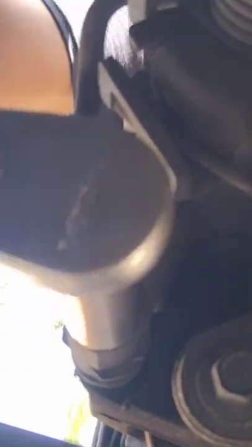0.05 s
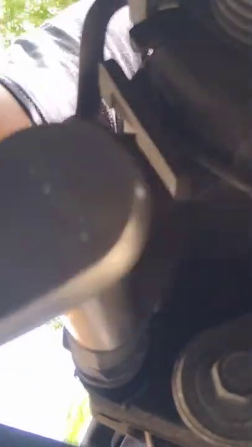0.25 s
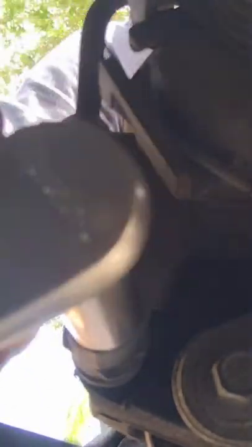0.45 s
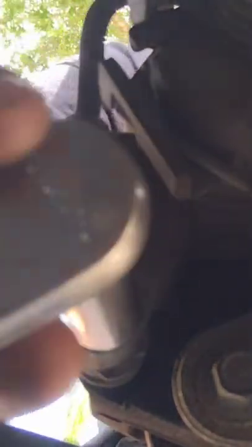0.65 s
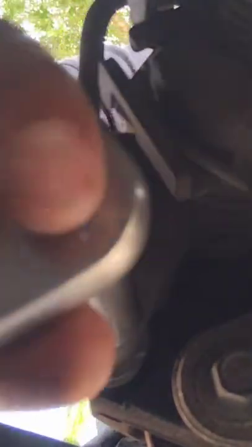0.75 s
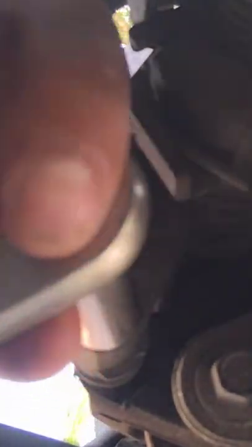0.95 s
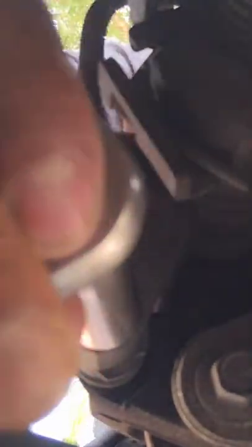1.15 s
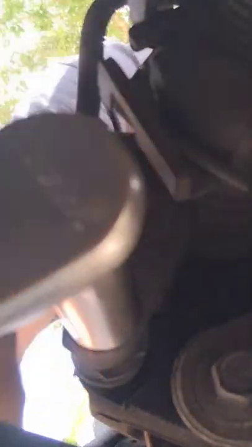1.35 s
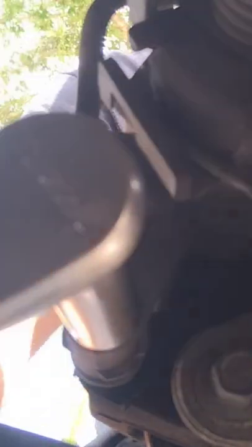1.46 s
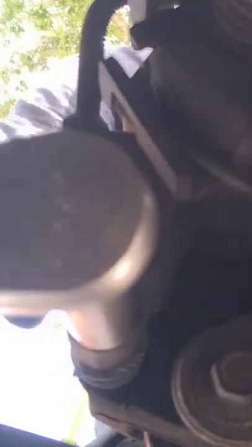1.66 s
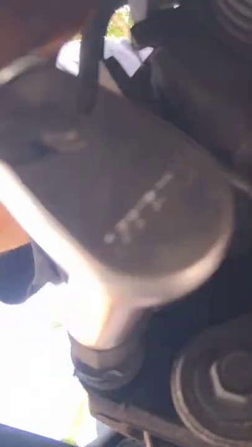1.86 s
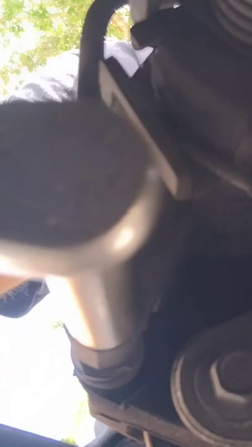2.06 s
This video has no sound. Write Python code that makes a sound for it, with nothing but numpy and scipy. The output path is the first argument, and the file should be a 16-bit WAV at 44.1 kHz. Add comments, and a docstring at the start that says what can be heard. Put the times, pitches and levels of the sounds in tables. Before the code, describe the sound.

A hand ratchet works a bolt under a vehicle, very close and dry. After a slight slide at 0.2 s, the socket strikes at 0.25 s with a loud bright steel clink, clatter and dull boom, dying quickly. Faint finger rubs follow until about 1.65 s. A gritty scrape peaks near 1.74 s, then six small crisp clicks run from 1.83 to 2.0 s, the last two nearly together. Quiet outdoor rumble and hiss.

```python
"""Hand ratchet on a bolt

A hand ratchet is worked on a bolt under a vehicle, very near a two-port microphone, over outdoor rumble and hiss.
Fingers and socket slide as shaped noise; the socket clinks home as damped steel modes, clatter and a dull boom.
It scrapes free as gritty noise that excites the steel, while the pawl clicks six times, the last two close
together, each click a burst of noise and modes that bounces twice and rattles out.
Level and phase differ between the ports, and loud sound makes the microphone's bias sag."""
import sys
import numpy as np
from scipy import signal
from scipy.fft import rfft, irfft, next_fast_len
from scipy.io import wavfile
from scipy.ndimage import map_coordinates

SR = 44100
rng = np.random.default_rng(int(sys.argv[2]) if len(sys.argv) > 2 else 0)


def wrap_up_sound(samples):
    """Save the sound to the file named by the first command line argument, as 16-bit audio."""
    columns = np.atleast_2d(samples).T
    # keep every value between -1 and 1, then stretch to whole-number steps
    tamed = np.clip(columns, -1, 1)
    steps = np.round(tamed * 32767).astype(np.int16)
    wavfile.write(sys.argv[1], SR, steps)


N = 92610
T = np.arange(N) / SR  # time in seconds
SIDE_OF = np.array([[.5], [-.5]])  # shares a left-right difference between left and right

# Spectrum of the outdoor air. Each row: frequency in Hz, relative level in dB per Hz.
AIR_SPECTRUM = [(12, -36.5), (20, -11), (94, -2.5), (390, -33), (680, -31.5), (1730, -43), (11900, -42.5),
                (14500, -50.5)]
# Correlation of the air between the ports. Each row: frequency in Hz, left-right likeness from 0 to 1.
AIR_LIKENESS = [(60, 0.94), (370, 0.78), (2280, 0.016), (14000, 0.24)]
AIR_DB = -64.5

# Slides of skin and steel. Each row: start in seconds, rise in seconds, hold in seconds, fall t60 in seconds,
# level in dB.
RUBS = [(0.2, 0.014, 0.0083, 0.22, -53.5), (0.285, 0.078, 0.054, 0.11, -61),
        (0.561, 0.0055, 0.0022, 0.29, -67), (.69, 0.013, 0.0082, 0.58, -75),
        (1.001, 0.0026, 0.0029, 0.11, -68), (1.12, 0.0051, 0.0048, 0.26, -77),
        (1.169, 0.019, 0.0026, 0.37, -67.5), (1.299, 0.014, 0.1, 0.11, -72.5),
        (1.548, 0.005, 0.007, 0.28, -71.5), (1.627, 0.037, 0.14, 0.29, -70.5)]
# Spectrum of the sliding friction. Each row: frequency in Hz, relative level in dB per Hz.
RUB_SPECTRUM = [(880, -42), (1500, -11.5), (6040, -12.5), (11800, -1), (14500, -21)]
# Resonances of the ratchet head under the slides. Each row: frequency in Hz, width in Hz, gain in dB.
RUB_RESONANCES = [(5460,27,13.5),(11580,60,7)]

# The frame is nudged, hit, and hums on. Each row: start in seconds, level in dB, t60 in seconds.
THUDS = [(.208, -57, .1), (0.2466, -36.5, .12), (0.259, -51, 0.49)]
# Dull answer of the frame. Each row: frequency in Hz, relative level in dB per Hz.
FRAME_SPECTRUM = [(40,-20),(190,-2),(420,-3),(900,-15.5),(1500,-51.5)]
CLINK_S, CLINK_DB, CLINK_RISE_S = .2474, -13, .0015  # start, gain of the ringing steel, rise
# Pitches of the steel struck on the bolt, in Hz.
SEATED_HZ = [65, 118, 1774, 1853, 2256, 2424, 2709, 3052, 3443, 3889, 4313, 4908, 5328, 5477, 6474, 8852,
             10490, 11780, 12200, 12692]
# The mode at each of those pitches. Each row: relative level in dB, t60 in seconds, left-minus-right level
# in dB, radians by which the left leads.
SEATED_MODES = [(-32.5,0.52,-1,0.5),(-22.5,0.19,-1.5,0.5),(-8,0.1,-1,1),(-15,0.2,0.5,3.5),(-14,0.1,1.5,1.5),(-8,0.13,0,2),(-11,0.14,-1,2),(-14,.42,3.03,2.5),
                (-10.5,.11,3.5,-1.5),(-6.5,.17,2,-1.33),(-12,0.16,5.5,2.5),(4.5,0.13,1.5,3.5),(-10.5,0.17,1.5,1.7),(-16,.13,4.5,1.3),(-14.5,0.15,1.5,-2.5),
                (-3.5,0.073,9.5,4),(-8,.115,0.37,-1.5),(-5,0.067,-9,4),(-3.5,0.092,-13.5,3),(-6,.07,-10,2)]
WEAK_HZ = (1650, 6500)  # range of many small partials between the strong ones
WEAK_DB, WEAK_T60 = -25.5, .1  # their middle relative level, and mean t60 in seconds
LINGER_DB, LINGER_T60 = -35, .4  # a faint part of the modes below that range's top rings on (t60 in s)
WAVER_DB, WAVER_PER_S = 2.5, 70  # each mode's level wavers at random: depth in dB, knots a second
# Noisy part of the clink. Each row: frequency in Hz, relative level in dB per Hz.
CLATTER_SPECTRUM = [(900, -39), (1770, -8), (4970, -5.5), (9410, -5), (12400, 1.5), (14500, -44)]
# Decay of the clatter. Each row: frequency in Hz, t60 in seconds.
CLATTER_T60 = [(1000, .1), (2500, .085), (6000, .055), (9000, .032), (13000, .042)]
CLATTER_DB = -9
# Direction of the clatter at the bolt. Each row: frequency in Hz, left-minus-right level in dB.
BOLT_LEAN = [(1000, 3), (5000, 5), (14000, -10)]

# Course of the drag. Each row: time in seconds, mean grit level in dB, dull rubbing level in dB.
DRAG = [(1.65,-100,-93.5),(1.703,-68.5,-68.5),(1.722,-64,-67),(1.744,-51.5,-67),(1.809,-73,-82.5),(1.991,-67,-71.5),(2.05,-88,-91.5)]
# Spectrum of the grit. Each row: frequency in Hz, relative level in dB per Hz.
SCRAPE_SPECTRUM = [(600, -21), (1900, -8.5), (4130, -19.5), (11700, -10.5), (14500, -21)]
# Modes of the same steel lifted off the bolt. Each row: frequency in Hz, relative level in dB, t60 in seconds.
FREED_MODES = [(1795,-17,3),(2185,-3,.4),(2420,4,.12),(3052,3,.22),(3890,-3,.2),(4910,6,.15),(5070,-19,1.5),(5471,5,.2)]
SCRAPE_RING_DB = -36

# Pawl clicks. Each row: start in seconds, level in dB, rattle t60 in seconds, mid-band share in dB
# (before a fixed 8 dB is added).
CLICKS = [(1.8283, -39, 0.0573, -15.5), (1.8845, -42.5, 0.046, -9), (1.929, -38.5, 0.077, -17),
          (1.9603, -41, 0.049, -10.5), (1.9889, -42, 0.063, -11.5), (1.999, -50.5, 0.088, -4.5)]
# Modes of the pawl. Each row: frequency in Hz, middle relative level in dB, t60 in seconds.
PAWL_MODES = [(3310, -22, 0.09), (5960, -14, 0.044), (9945, 2.5, 0.047), (10620, -7, 0.057),
              (14130, -13, 0.055)]
# Bright spray of a click. Each row: frequency in Hz, relative level in dB per Hz.
SNAP_SPECTRUM = [(1800, -60), (3530, -35.5), (9300, -14.5), (10400, -6), (13900, -17)]
# Duller part of a click. Each row: frequency in Hz, relative level in dB per Hz.
HEAD_SPECTRUM = [(2000,-23.5),(3300,-7.5),(6000,-6),(9000,-11)]
PAWL_DB, MODE_SCATTER_DB = -5, 5  # ring against the click level, and random spread of its modes
BOUNCE_S, BOUNCE_LOSS_DB = .0014, 3  # nominal spacing of the bounces, loss at each
TICK_DB, TICK_T60, RATTLE_DB = 15, .004, 2  # levels against the click level, t60 in seconds
HEAD_SHARE = .5  # duller part's t60 as a share of the rattle's

# Direction of the ratchet head. Each row: frequency in Hz, left-minus-right level in dB.
HAND_LEAN = [(370, 0), (2280, 7), (14000, -5.5)]
# Phase of the ratchet head. Each row: frequency in Hz, radians by which the left leads.
HAND_TURN = [(0, -1), (3010, -14), (14200, -51.5)]
SPREAD_DB = -.5  # unlike part of near noises at the two ports

# Bias sag under loud sound. Each row is one port, left then right: gain of the squared pressure in dB.
SAG_DB = [
    [-0.5],
    [5],
]
SAG_FAST_HZ, SAG_SLOW_HZ = 10, 2.2  # corner of the sag's onset and of its recovery
TOP_HZ = 14600  # band limit


def amp(db):
    """Decibel law: amplitude gain of a level in dB."""
    return 10 ** (np.asarray(db) / 20)


def unit(x):
    """Normalisation of power: the signal scaled to rms 1."""
    return x / np.sqrt(np.mean(x ** 2) + 1e-20)


def along(points, hz):
    """Linear interpolation of (Hz, value) points on a logarithmic frequency axis."""
    f, value = np.transpose(points)
    return np.interp(np.log(hz + 1), np.log(f + 1), value)


def filtered(x, response):
    """Linear filtering: the spectrum of x times a complex response of frequency."""
    size = next_fast_len(N + 8192)
    spectrum = rfft(x, size) * response(np.fft.rfftfreq(size, 1 / SR))
    return irfft(spectrum, size)[..., :N]


def wobble(rate):
    """Spline interpolation of random knots, rate of them a second, into a smooth curve."""
    knots = rng.standard_normal(int(N * rate / SR) + 4)
    return map_coordinates(knots, [T * rate])


def placed(x, lean, turn):
    """Interaural-style cues: level and phase differences between the ports, by frequency."""
    def response(hz):
        return amp(SIDE_OF * along(lean, hz)) * np.exp(1j * SIDE_OF * along(turn, hz))
    return filtered(x, response)


def hiss(spectrum):
    """Partial coherence of a near noise: a shared part and an opposed part, rms 1 over both ports."""
    shared, opposed = filtered(rng.standard_normal((2, N)), lambda hz: amp(along(spectrum, hz)))
    opposed = amp(SPREAD_DB) * opposed
    return unit(np.array([shared + opposed, shared - opposed]))


def dull():
    """Coloured noise: the low answer of the frame, rms near 1, mostly alike at both ports."""
    shared, opposed = unit(filtered(rng.standard_normal((2, N)), lambda hz: amp(along(FRAME_SPECTRUM, hz))))
    return shared + SIDE_OF * opposed


def blow(start_s, rise_s, t60):
    """Impulsive excitation: a quick saturating rise times an exponential fall of 60 dB in t60."""
    t = np.maximum(T - start_s, 0)
    return (1 - np.exp(-t / rise_s)) * amp(-60 * t / t60)


def ring(modes, start_s, rise_s, scatter_db=0, linger=0):
    """Modal superposition: damped sines, neighbours in opposite sign, each with its own port differences."""
    luck = rng.standard_normal(len(modes))
    waver = wobble(WAVER_PER_S)
    out = 0
    for k, (hz, db, t60, *side) in enumerate(modes):
        lean_db, lead = (side + [0, 0])[:2]
        wave = np.sin(2 * np.pi * hz * (T - start_s) + SIDE_OF * lead)
        fade = blow(start_s, rise_s, t60)
        if hz < WEAK_HZ[1]:
            fade = fade + linger * blow(start_s, rise_s, LINGER_T60)
        own_waver = np.roll(waver, k * N // len(modes))  # one curve, shifted for each mode
        level_db = db + scatter_db * luck[k] + WAVER_DB * own_waver + SIDE_OF * lean_db
        out = out + (-1) ** k * amp(level_db) * fade * wave
    return out


def air():
    """Diffuse field: distant rumble and hiss whose mid and side parts set the likeness of the ports."""
    def mid_and_side(hz):
        angle = np.arccos(np.clip(along(AIR_LIKENESS, hz), -1, 1)) / 2
        return amp(along(AIR_SPECTRUM, hz)) * [np.cos(angle), np.sin(angle)]
    mid, side = filtered(rng.standard_normal((2, N)), mid_and_side)
    pair = np.array([mid + side, mid - side]) / np.std(mid)
    return amp(AIR_DB) * pair


def rubs():
    """Sliding friction: short dry noises rise, hold and fall with a grainy flutter; the head resonates."""
    level = 0
    for start_s, rise_s, hold_s, fall_t60, db in RUBS:
        rise = np.clip((T - start_s) / rise_s, 0, 1) ** 2
        falling = np.maximum(T - start_s - rise_s - hold_s, 0)
        level = level + amp(db - 60 * falling / fall_t60) * rise
    flutter = amp(.86 * wobble(92) + .9 * wobble(38))

    def resonances(hz):
        gain = 1
        for center, width, db in RUB_RESONANCES:
            damping = 1j * hz * width
            gain = gain + amp(db) * damping / (center ** 2 - hz ** 2 + damping)
        return gain
    return filtered(level * flutter * hiss(RUB_SPECTRUM), resonances)


def clatter():
    """Frequency-dependent damping: the noise of the impact dies band by band."""
    hz, t, bands = signal.stft(hiss(CLATTER_SPECTRUM), SR, nperseg=128)
    t60 = along(CLATTER_T60, hz)[:, None]
    fade = amp(-60 * np.maximum(t - CLINK_S, 0) / t60)
    noise = signal.istft(bands * fade, SR, nperseg=128)[1][:, :N]
    onset = blow(CLINK_S, .0006, 10)  # the fall here is slow; the bands do the fading
    return placed(noise * onset, BOLT_LEAN, [(1, 0)])


def clink():
    """Impact excitation: the socket hits home and sets off steel modes, clatter and the frame's boom."""
    noise = amp(CLATTER_DB) * clatter()
    boom = dull() * sum(amp(db) * blow(start_s, .002, t60) for start_s, db, t60 in THUDS)
    low, high = WEAK_HZ
    weak = []
    for k, (u, v, w) in enumerate(rng.random((40, 3))):
        hz = low * (high / low) ** ((k + u) / 40)
        weak.append((hz, WEAK_DB, WEAK_T60 * (.5 + v), 3, 6 * w))
    strong = [(hz, *row) for hz, row in zip(SEATED_HZ, SEATED_MODES)]
    linger = amp(LINGER_DB)
    steel = ring(strong, CLINK_S, CLINK_RISE_S, linger=linger)
    steel = steel + ring(weak, CLINK_S, CLINK_RISE_S, scatter_db=4.5, linger=linger)
    return amp(CLINK_DB) * steel + noise + boom


def scrape():
    """Convolution of friction with an impulse response: grit keeps exciting the freed steel over dull rubbing."""
    time_s, grit_db, rub_db = np.transpose(DRAG)
    grit = amp(np.interp(T, time_s, grit_db) + 3.6 * wobble(250))
    force = grit * rng.standard_normal((2, N))
    sung = signal.fftconvolve(force, ring(FREED_MODES, 0, .001), axes=1)[:, :N]
    rubbing = amp(np.interp(T, time_s, rub_db)) * dull()
    return grit * hiss(SCRAPE_SPECTRUM) + amp(SCRAPE_RING_DB) * sung + rubbing


def pawl():
    """Repeated inelastic impact: each click lands, bounces twice with loss and rattles out."""
    out = 0
    for start_s, db, t60, mid_db in CLICKS:
        for k in range(3):
            at = start_s + k * BOUNCE_S * rng.uniform(.85, 1.3)
            gain = amp(db - k * BOUNCE_LOSS_DB)
            tick = amp(TICK_DB) * blow(at, .0001, TICK_T60) * hiss(SNAP_SPECTRUM)
            steel = amp(PAWL_DB) * ring(PAWL_MODES, at, .0004, scatter_db=MODE_SCATTER_DB)
            out = out + gain * (tick + steel)
        flutter = amp(db + 2.8 * wobble(690))
        bright = amp(RATTLE_DB) * blow(start_s, .00048, t60) * hiss(SNAP_SPECTRUM)
        duller = amp(mid_db + 8) * blow(start_s, .00013, HEAD_SHARE * t60) * hiss(HEAD_SPECTRUM)
        out = out + flutter * (bright + duller)
    return out


def scene():
    """Superposition: all sources summed at the two ports."""
    hand = rubs() + scrape() + pawl()
    return air() + clink() + placed(hand, HAND_LEAN, HAND_TURN)


def record(dry):
    """Quadratic distortion: loud sound pushes each capsule's bias down and it swings back; the band is limited."""
    def swing(hz):
        recovery = (1j * hz / (SAG_SLOW_HZ + 1j * hz)) ** 2
        onset = (SAG_FAST_HZ / (SAG_FAST_HZ + 1j * hz)) ** 2
        return recovery * onset
    sagged = dry - amp(SAG_DB) * filtered(dry ** 2, swing)
    return filtered(sagged, lambda hz: (hz < 16000) / (1 + (hz / TOP_HZ) ** 100))


dry = scene()
out = record(dry)
wrap_up_sound(out)
```